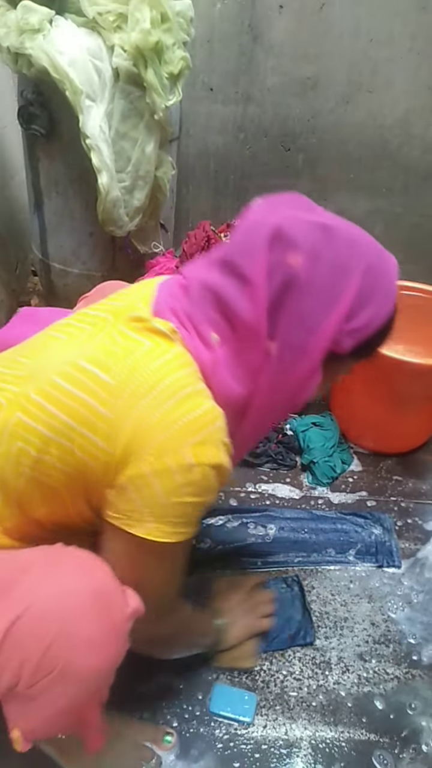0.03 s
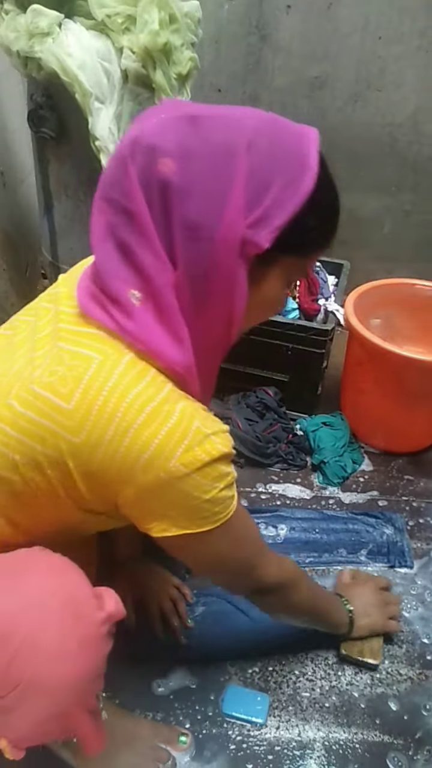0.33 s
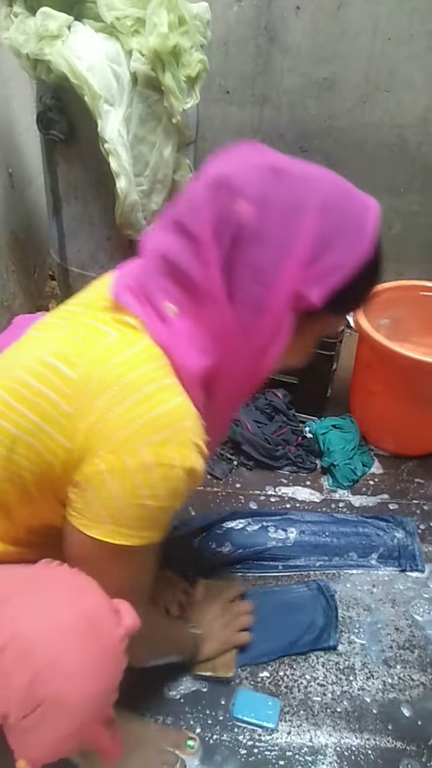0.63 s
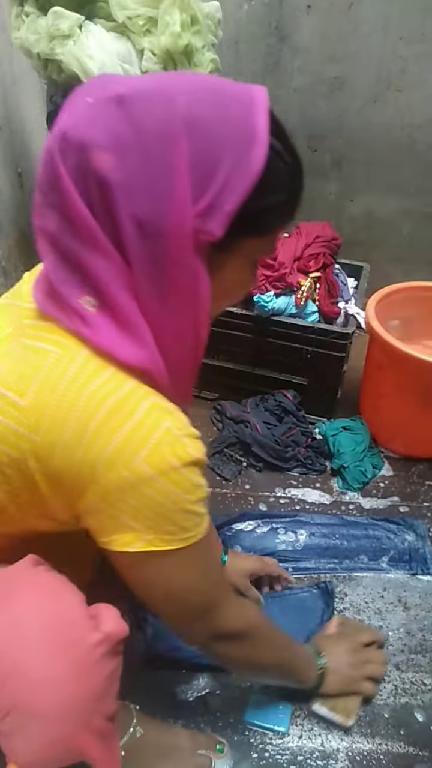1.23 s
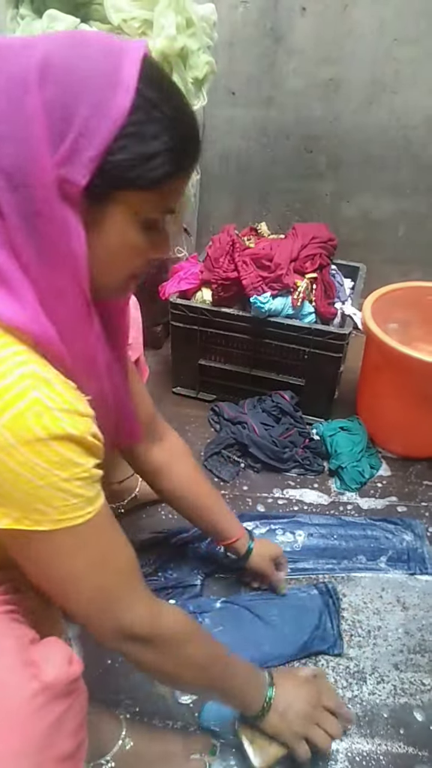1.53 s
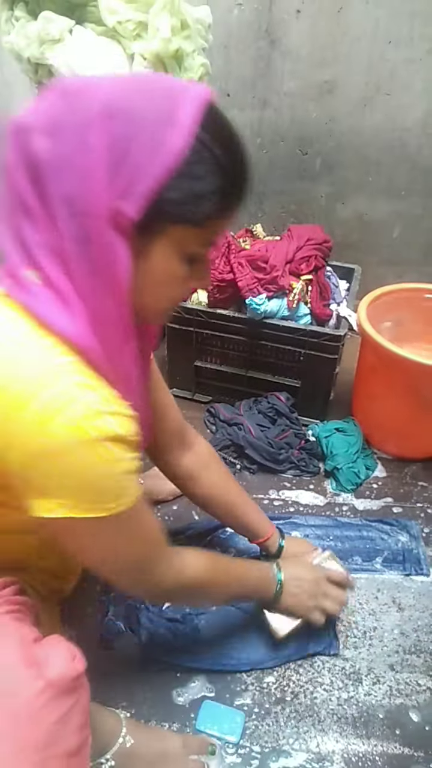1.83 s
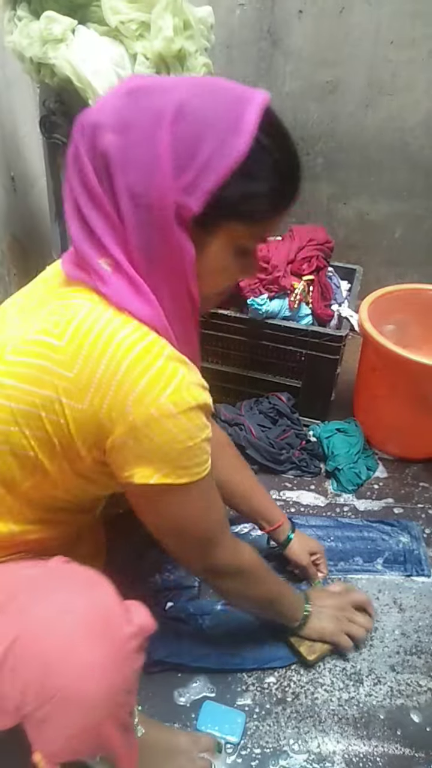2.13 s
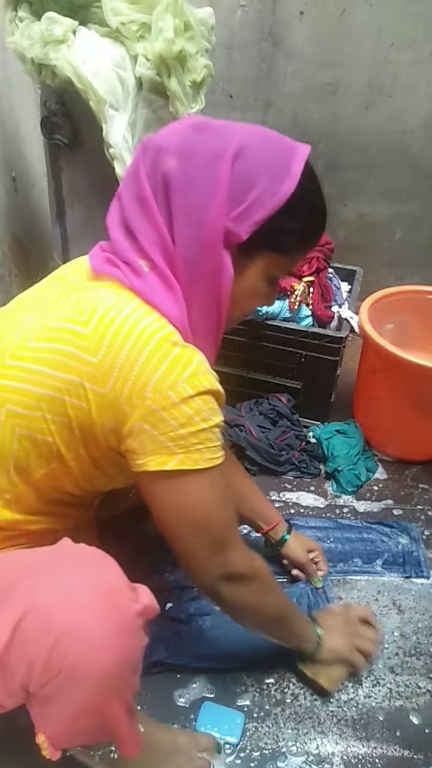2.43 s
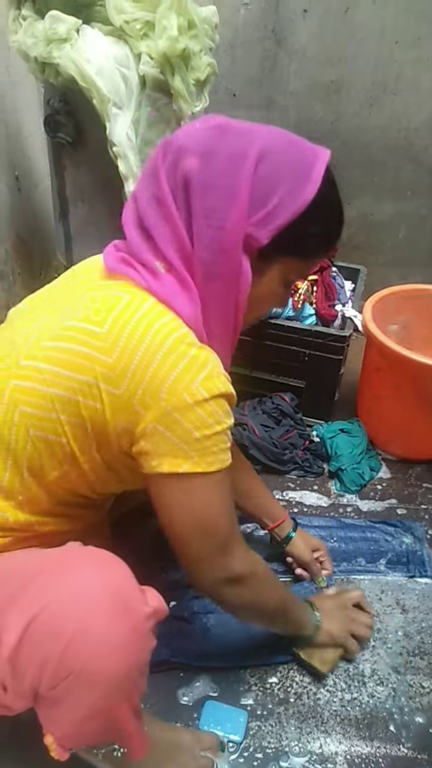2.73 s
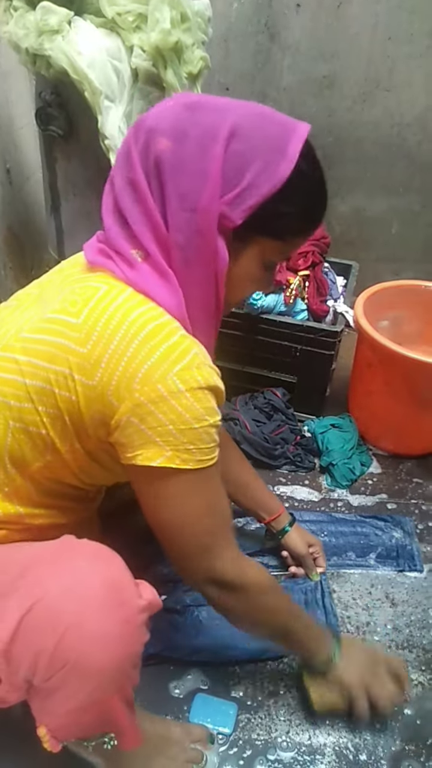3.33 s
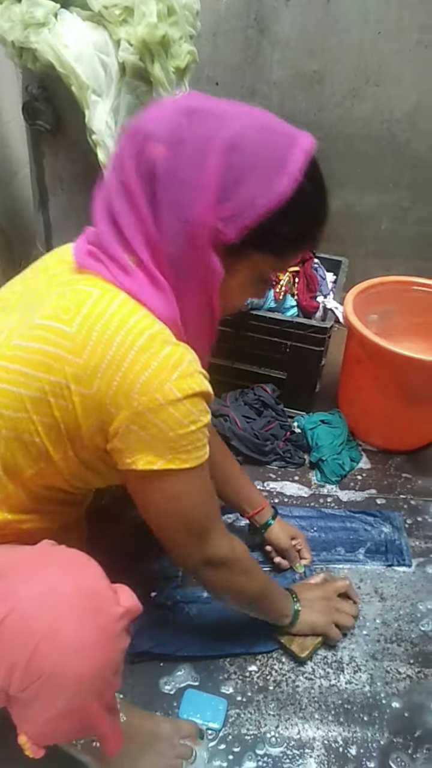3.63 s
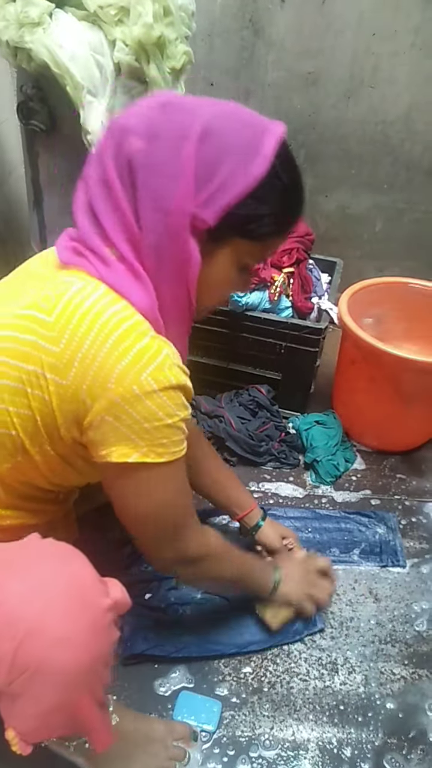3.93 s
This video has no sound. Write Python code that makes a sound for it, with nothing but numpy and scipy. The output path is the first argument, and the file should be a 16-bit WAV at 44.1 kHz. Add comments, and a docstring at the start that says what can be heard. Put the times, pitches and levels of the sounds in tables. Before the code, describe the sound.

A hand brush scrubs wet denim close by, in raspy, juddering strokes with fizzing suds and faint wet ticks. Bangles clink lightly at 1 second. The scrubbing pauses from about 1.4 to 1.9 seconds, then continues at roughly three strokes a second until 4, with a small brush knock at 2.7. Concrete walls add a short echo; a low motor drone and distant traffic rumble underneath.

```python
"""A hand brush scrubs wet denim on a concrete floor in a small washing yard.
Each stroke flicks bristles over the weave and fizzes in the suds. Where the bristles catch, they
judder and ring the brush block. The wet cloth ticks and squeaks, bangles clink once and the brush
knocks once, all with a short echo off the walls. Behind them a motor drones and far traffic rumbles."""
import sys
import numpy as np
from scipy import signal
from scipy.fft import rfft, irfft
from scipy.io import wavfile
from scipy.ndimage import uniform_filter1d

SR = 44100
rng = np.random.default_rng(int(sys.argv[2]) if len(sys.argv) > 2 else 0)


def int16_out(signal):
    """Quantize to a 16-bit WAV file."""
    q = np.round(np.clip(np.atleast_2d(signal).T, -1, 1) * 32767)
    wavfile.write(sys.argv[1], SR, q.astype(np.int16))


N = 176400

# brush strokes: start_s, rise_s, end_s, release_s, bristle_db, suds_db
STROKES = [(-.04, .125, .17, .035, -41, -53), (.245, .045, .325, .045, -53, -61),
           (.58, .03, .627, .025, -51, -56), (.645, .11, .865, .06, -42, -52.5),
           (.87, .04, .997, .028, -52, -56.5), (1.1, .08, 1.29, .055, -44, -49.5),
           (1.91, .05, 1.965, .022, -50, -57), (2.0, .04, 2.13, .03, -65, -71),
           (2.13, .04, 2.215, .022, -48, -54.5), (2.335, .1, 2.53, .025, -45.5, -52),
           (2.703, .04, 2.77, .03, -50, -56), (2.81, .1, 2.935, .028, -51, -57),
           (3.109, .025, 3.258, .022, -45, -50.5), (3.478, .03, 3.53, .024, -49.5, -57),
           (3.645, .08, 3.752, .02, -50, -56.5), (3.955, .04, 4.03, .03, -53, -60)]
# light drags of the wet cloth: middle_s, half_length_s, level_db
DRAGS = [(1.38, 0.036, -58), (3.05, 0.11, -71.5), (3.4, 0.092, -70), (3.66, 0.051, -64)]
# tone of the bristles and of the suds: pitch_hz, level_db
BRISTLE_TONE = [(200, -40), (600, -5), (1100, -5), (1500, 2), (2100, 4.5), (2450, 0), (2800, -5.5),
                (3300, 0), (3900, 0.5), (4400, -3.5), (5200, -4.5), (6000, -16), (7000, -24.5), (9000, -23),
                (16000, -33)]
SUDS_TONE = [(1000, 0), (4000, -8), (6000, -7.5), (7200, -12), (8200, -9), (9200, -12.5), (10500, -4.5),
             (12500, -2), (14000, -0.5), (15700, -1.5), (17000, -20)]
# bristles catching, and heavy pushes that ring the floor: middle_s, half_length_s, level_db
CATCHES = [(.08, 0.027, -41), (.17, 0.027, -39.5), (.295, 0.037, -46), (.62, 0.011, -44),
           (.75, 0.021, -35.5), (.82, 0.016, -42), (.857, .015, -34.5), (1.31, 0.087, -47.5),
           (1.96, 0.018, -43), (2.185, 0.028, -40.5), (2.425, 0.025, -39.5), (2.478, .024, -37),
           (2.75, 0.032, -45), (2.915, 0.027, -40), (3.134, 0.015, -37), (3.173, 0.013, -35.5),
           (3.512, .014, -37), (3.724, 0.018, -40.5), (3.99, 0.0086, -39)]
PUSHES = [(.15, 0.064, -50.5), (.86, .035, -43), (1.96, .012, -50), (2.48, 0.014, -52), (3.16, 0.034, -52)]
# ringing notes of the brush block: pitch_hz, width_hz, level_db
BLOCK_NOTES = [(771, 130, -18), (1380, 440, -8.5), (1780, 400, -5.5), (2040, 270, -1.5), (2223, 220, -7.5),
               (3860, 700, -18.5)]
# small wet ticks: start_s, level_db
TICKS = [(1.451, -60.5), (1.485, -71), (2.0, -62), (2.045, -73), (2.105, -60), (2.27, -62), (2.345, -67),
         (2.611, -61), (3.065, -67), (3.463, -60), (3.585, -69), (3.935, -60.5)]
# squeak of wet cloth: middle_s, half_length_s, level_db
SQUEAKS = [(3.407, .012, -63)]
# notes of the bangles and of the knock: pitch_hz, level_db, ring_s (time to fade by 60 dB)
BANGLE_NOTES = [(5254, -16, .06), (10000, -13, .06), (13500, -5, .012), (13840, -3, .018),
                (14380, -10, .02), (15660, -8, .025)]
KNOCK_NOTES = [(452, 2, .07), (797, -3, .08), (1050, -10, .04), (2030, -9, .025)]
# notes of the motor: pitch_hz, level_db
MOTOR_NOTES = [(27.8, -43), (52.5, -41.5)]
# how fast a distant engine fires: time_s, rate_hz
ENGINE_RATE = [(2.65, 35.6), (2.85, 35.8), (3.05, 34.4), (3.3, 35.9), (3.5, 38.8)]
# engine overtones at 2, 3, 4... times that rate: level_db
ENGINE_OVERTONES = [-12, 0, -3, -3, -8, -16.5]
# swells of the engine and of a low hum: middle_s, half_length_s, level_db
ENGINE_SWELLS = [(2.74, .05, -39.5), (2.88, 0.078, -41.5), (3.22, 0.14, -41)]
HUM_SWELLS = [(.25, 0.1, -43), (.7, 0.065, -38), (.87, 0.054, -38), (1.98, 0.12, -43.5), (2.39, 0.028, -40),
              (3.48, 0.036, -40.5)]
# tone of the outdoor hush and of the rumble: pitch_hz, level_db
YARD_TONE = [(120, -48), (200, -1.5), (259, -5), (316, -8.5), (440, -6), (482, -8), (722, -8), (851, -9.5),
             (933, -5.5), (1140, -9.5), (1910, -12), (3020, -29), (4680, -32.5), (5730, -52), (16000, -59)]
RUMBLE_TONE = [(15, -10), (29, 5), (39, -7.5), (62, -10.5), (80, -6.5), (110, -8.5), (150, -7.5),
               (200, -16), (260, -25.5), (350, -30), (600, -58.5)]
# rise and fall of the rumble: time_s, level_db
RUMBLE_LEVELS = [(0, -44.5), (.55, -43), (.65, -44.5), (.92, -40), (1.02, -44.5), (1.45, -43), (1.6, -42),
                 (1.8, -43.5), (2.2, -47), (2.4, -41), (2.62, -43.5), (2.74, -38.5), (3.45, -42),
                 (3.7, -42), (4, -43.5)]

# gains added to the levels in the tables
BRISTLE_GAIN_DB, SUDS_GAIN_DB, JUDDER_GAIN_DB, RUMBLE_GAIN_DB = 3, .8, -.5, 2.5


def scrubbing():
    """Bristles flick over the weave and tiny soap bubbles burst, both following the strokes."""
    rasp = sum(undb(db) * stroke(*timing, slope_db_per_s=-.5) for *timing, db, _ in STROKES)
    fizz = sum(undb(db) * stroke(*timing, slope_db_per_s=13) for *timing, _, db in STROKES)
    flicks = colour(clicks(per_s=5000, spread_db=2.6), BRISTLE_TONE)
    bubbles = colour(clicks(per_s=5000, spread_db=3.3), SUDS_TONE)
    bristles = undb(BRISTLE_GAIN_DB) * (rasp + swells(DRAGS)) * flicks
    suds = undb(SUDS_GAIN_DB) * fizz * bubbles
    weave = undb(.8 * wander(per_s=78))
    return (bristles + suds) * weave


def stroke(start, rise, end, release, slope_db_per_s):
    """Loudness of one push of the arm: it eases in, sags or grows, then dies away."""
    t = seconds()
    onset = np.sin(np.pi / 2 * np.clip((t - start) / rise, 0, 1)) ** 2
    hold = undb(slope_db_per_s * (np.clip(t, start, end) - (start + rise + end) / 2))
    return onset * hold * np.exp(-np.maximum(t - end, 0) / release)


def judder():
    """Tufts stick and slip, ringing the brush block and, under a heavy push, the floor."""
    slips = lambda: clicks(per_s=900, spread_db=3)
    block = unit(sum(undb(db) * resonate(slips(), hz, width) for hz, width, db in BLOCK_NOTES))
    floor = resonate(slips(), hz=762, width_hz=210)
    return undb(JUDDER_GAIN_DB) * swells(CATCHES) * block + swells(PUSHES) * floor


def wet_ticks(fade_s=.014):
    """Wet cloth gives brief, quiet crackles."""
    t = seconds()
    level = sum(undb(db) * (t > at) * np.exp(-np.abs(t - at) / fade_s) for at, db in TICKS)
    drops = clicks(per_s=2500, spread_db=1)
    return level * (undb(4.5) * colour(drops, BRISTLE_TONE) + undb(-7.5) * colour(drops, SUDS_TONE))


def squeak():
    """Wet cloth squeaks thinly as it is pulled straight."""
    return swells(SQUEAKS) * resonate(rng.standard_normal(N), hz=4700, width_hz=300)


def hit(start_s, notes, crack_db, crack_hz, crack_s):
    """Two hard things meet: a short crack, and notes that ring and fade."""
    age = np.maximum(seconds() - start_s, 0)
    ring = sum(undb(db - 60 * age / ring_s) * np.sin(2 * np.pi * hz * age) for hz, db, ring_s in notes)
    crack = resonate(rng.standard_normal(N), crack_hz, crack_hz / 4) * np.exp(-age / crack_s)
    return (ring + undb(crack_db) * crack) * np.minimum(age / .0004, 1)


def wall_echo(x, ring_s=.2, echo_db=-11, dull_above_hz=7000):
    """Close concrete walls add a short, slightly dull echo."""
    t = np.arange(SR // 2) / SR
    tail = rng.standard_normal(len(t)) * np.exp(-np.log(1000) * t / ring_s) * (t > .003)
    tail = signal.lfilter(*signal.butter(1, dull_above_hz, fs=SR), tail / np.linalg.norm(tail))
    return x + undb(echo_db) * signal.fftconvolve(x, tail)[:N]


def motor():
    """A motor drones on two deep notes that waver in level and pitch."""
    return sum(undb(db + 2.4 * wander(5.02)) * np.sin(wavering_phase(hz, depth=.0187, per_s=4))
               for hz, db in MOTOR_NOTES)


def traffic():
    """A distant engine swells briefly, and a low hum comes and goes."""
    rate_hz = np.interp(seconds(), *np.array(ENGINE_RATE).T)
    firing = wavering_phase(rate_hz, depth=.0078, per_s=15)
    engine = sum(undb(db + 1.3 * wander(8.3)) * np.sin(k * firing + 2 * np.pi * rng.random())
                 for k, db in enumerate(ENGINE_OVERTONES, start=2))
    hum = np.sin(wavering_phase(hz=110.4, depth=.0415, per_s=24.93))
    hum = unit(hum * undb(3.2 * wander(25)))
    return swells(ENGINE_SWELLS) * engine + swells(HUM_SWELLS) * hum


def outdoor_noise(hush_db=-48):
    """A nearly steady outdoor hush lies over a low rumble that rises and falls."""
    hush = colour(rng.standard_normal(N), [(100, -34)] + list(YARD_TONE))
    hush *= undb(hush_db + .45 * wander(8))
    rumble_db = RUMBLE_GAIN_DB + np.interp(seconds(), *np.array(RUMBLE_LEVELS).T)
    return hush + undb(rumble_db) * colour(rng.standard_normal(N), RUMBLE_TONE)


def undb(db):
    """Turn decibels into a number to multiply by."""
    return 10 ** (np.asarray(db) / 20)


def unit(x):
    """Scale a sound to an average power of 1."""
    return x / np.sqrt(np.mean(x ** 2))


def seconds():
    """The time of every sample."""
    return np.arange(N) / SR


def wander(per_s):
    """A smooth random drift with a spread near 1."""
    step = int(SR / per_s)
    stairs = np.repeat(rng.standard_normal(N // step + 1), step)
    return unit(uniform_filter1d(stairs, step)[:N])


def wavering_phase(hz, depth, per_s):
    """The angle of a wave whose pitch drifts by about the fraction `depth`."""
    return 2 * np.pi * np.cumsum(hz * (1 + depth * wander(per_s))) / SR


def colour(x, tone):
    """Shape a sound's lows and highs with a tone table; power 1."""
    hz, db = np.array(tone).T
    all_hz = np.maximum(np.arange(N // 2 + 1) * SR / N, 1)
    gain = undb(np.interp(np.log(all_hz), np.log(hz), db))
    return unit(irfft(rfft(x) * gain, N))


def resonate(x, hz, width_hz):
    """Make a sound ring around one pitch; power 1."""
    b, a = signal.iirpeak(hz, hz / width_hz, fs=SR)
    return unit(signal.lfilter(b, a, signal.lfilter(b, a, x)))


def clicks(per_s, spread_db):
    """Tiny random clicks, a few stronger than the rest."""
    size = undb(spread_db * np.minimum(rng.exponential(size=N), 5))
    return (rng.random(N) < per_s / SR) * size * rng.choice([-1, 1], N)


def swells(table):
    """Loudness that rises and falls smoothly once for each row."""
    return np.sqrt(sum(undb(db) ** 2 * np.exp(-((seconds() - at) / half) ** 2) for at, half, db in table))


def scene():
    """Brush, cloth and bangles echo in the yard, over the background."""
    washing = scrubbing() + judder() + wet_ticks() + squeak()
    clink = undb(-31) * hit(1.0098, BANGLE_NOTES, crack_db=-.5, crack_hz=13700, crack_s=.005)
    knock = undb(-38) * hit(2.696, KNOCK_NOTES, crack_db=-21, crack_hz=2500, crack_s=.0054)
    return (wall_echo(washing + clink + knock) + motor() + traffic() + outdoor_noise())[None]


def record(dry):
    """Cut off the highest treble, above 15800 Hz."""
    return signal.sosfilt(signal.ellip(10, .2, 80, 15800, fs=SR, output="sos"), dry)


dry = scene()
out = record(dry)
int16_out(out)
```